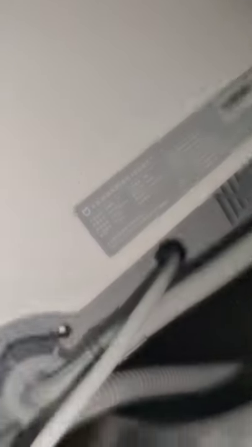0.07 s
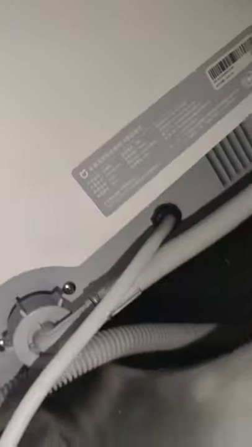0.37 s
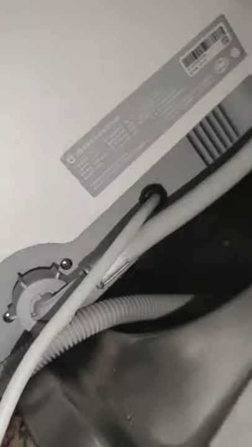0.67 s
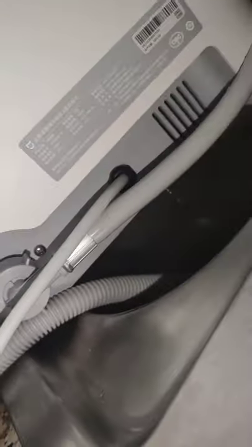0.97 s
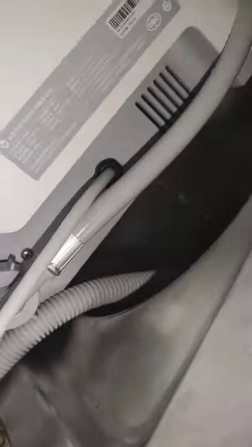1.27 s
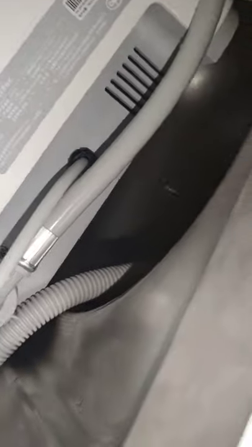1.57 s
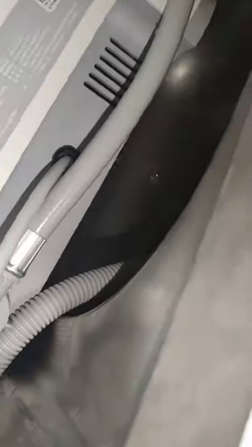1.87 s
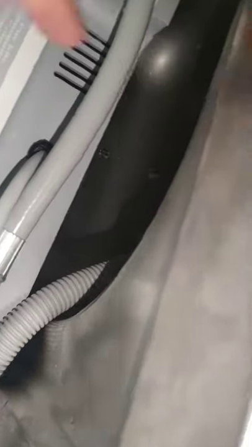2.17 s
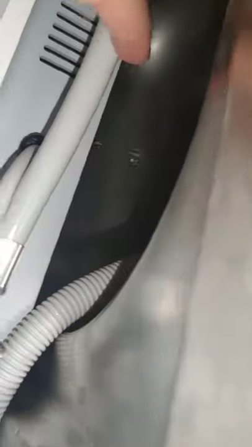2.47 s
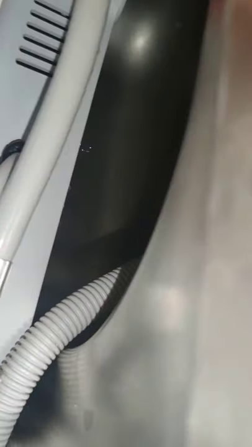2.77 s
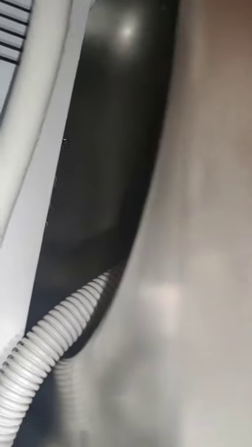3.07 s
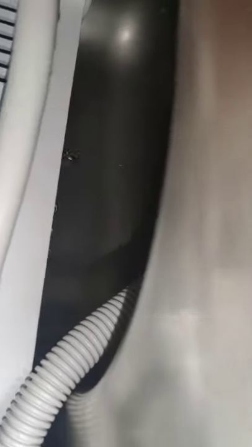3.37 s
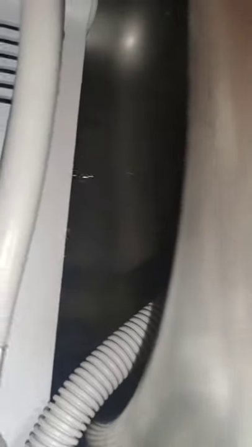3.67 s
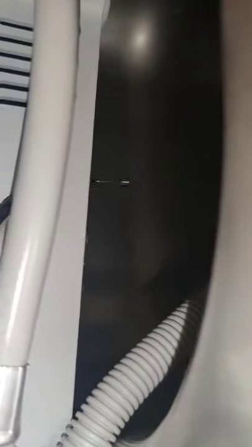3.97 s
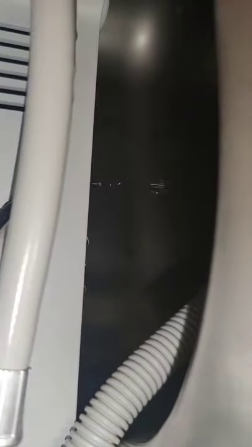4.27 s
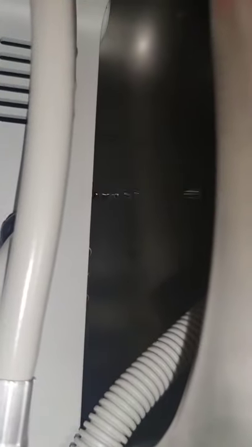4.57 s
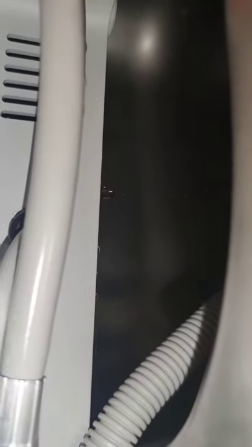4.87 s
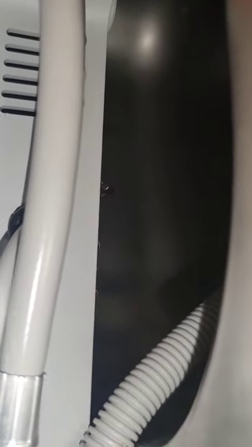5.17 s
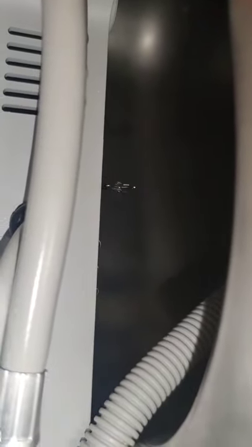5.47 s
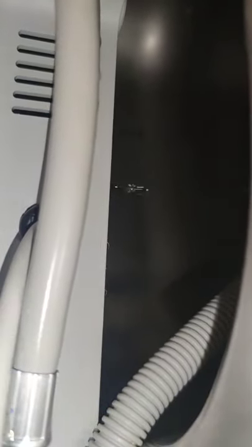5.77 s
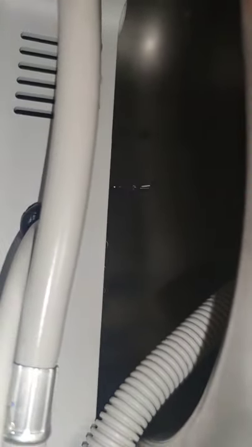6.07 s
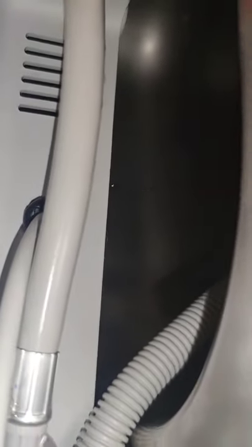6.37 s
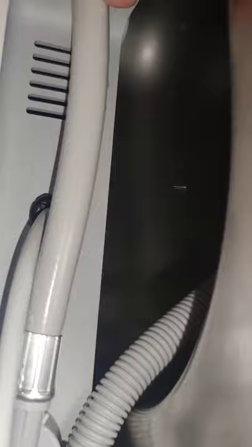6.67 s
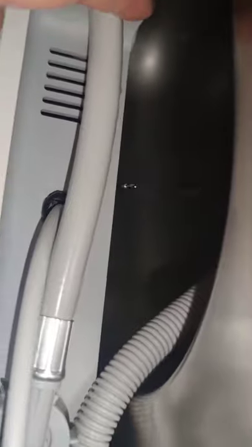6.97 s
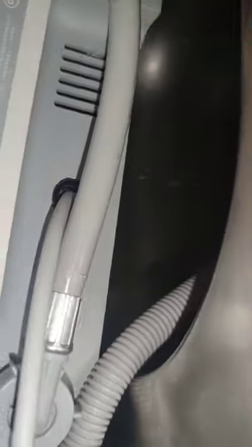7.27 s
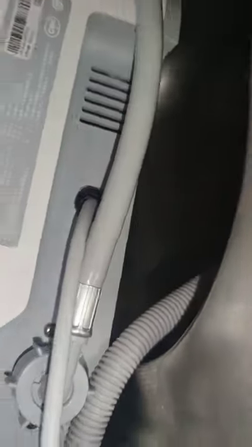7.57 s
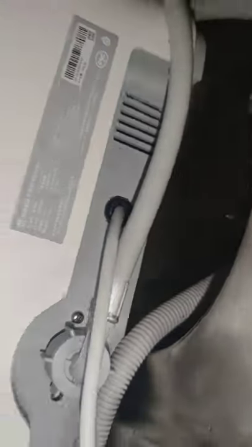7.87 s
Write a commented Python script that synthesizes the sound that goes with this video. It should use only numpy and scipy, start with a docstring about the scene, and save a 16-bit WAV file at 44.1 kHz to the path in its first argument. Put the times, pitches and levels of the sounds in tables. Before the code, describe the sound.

A low, steady pump hum and churning water come from a household dishwasher, with the microphone near its base. Spray sweeps around inside in a regular rhythm, faintly ringing the panels among drips and splashes. The hum grows slightly as the microphone moves in, and three small plastic knocks sound. After another knock and a soft rub it eases back, and the pump quickens right at the end.

```python
"""A dishwasher runs, heard close to its base. From the start the pump hums in harmonics of a cycle three
mains periods long, turbulent water rumbles and churns, and the spray arm sweeps by a little over twice
a second, ringing the panels amid ticking drops and splashes. The microphone moves in and turns to the
side at 2.3 s with a rub of the hand; three dry knocks follow near 3.5 s, and a knock and a rub near 6 s
as it draws away. At the very end the hum sinks, the pump speeds up and the water surges."""
import sys
import numpy as np
from scipy import signal
from scipy.fft import rfft, irfft
from scipy.io import wavfile
from scipy.ndimage import uniform_filter1d

SR = 44100
rng = np.random.default_rng(int(sys.argv[2]) if len(sys.argv) > 2 else 0)


def dump(signal):
    """Clip the signal to [-1, 1] and save it as 16-bit WAV at the path in sys.argv[1]."""
    limited = np.clip(np.atleast_2d(signal).T, -1, 1)
    pcm = np.round(limited * 32767).astype(np.int16)
    wavfile.write(sys.argv[1], SR, pcm)


N = 353196
TIME, BINS = np.arange(N) / SR, np.fft.rfftfreq(N, 1 / SR)
CHANGE_S, CHANGE_LENGTH_S = 7.85, 0.033  # the pump changes pace
LULL_S, LULL_LENGTH_S = 7.89, 0.055  # its drive falls away briefly

def amp(db):
    """Decibels to amplitude ratio."""
    return 10 ** (np.asarray(db) / 20)

def unit(x):
    """Normalisation to rms 1."""
    return x / np.sqrt(np.mean(x ** 2) + 1e-30)

def curve(rows):
    """Linear interpolation of a time table at every sample."""
    s, *columns = np.transpose(rows)
    return np.array([np.interp(TIME, s, c) for c in columns])

def spectrum(rows):
    """Interpolation of a table over log frequency at every bin."""
    hz, *columns = np.transpose(rows)
    return np.array([np.interp(np.log(BINS + 1), np.log(hz), c) for c in columns])

def drift(rate_hz):
    """Slow random modulation of rms 1."""
    knots = rng.standard_normal(4000)
    return unit(np.interp(2 * rate_hz * TIME + rng.random(), np.arange(len(knots)), knots))

def swell(u):
    """A half-cosine envelope, one unit of time long."""
    return np.cos(np.pi * np.clip(u, -.5, .5))

def step(s, length_s):
    """A raised-cosine transition from 0 to 1, centred on s."""
    return .5 + .5 * np.sin(np.pi * np.clip((TIME - s) / length_s, -.5, .5))

def changed():
    """0 while the pump runs steadily, 1 once it changes pace."""
    return step(CHANGE_S, CHANGE_LENGTH_S)

# Closeness of the microphone. Each row: time in seconds, level of the deepest hum in dB.
PROXIMITY = [(0.1, -33.5), (0.89, -34), (2.2, -32.5), (2.31, -32), (4.32, -29.5), (6.6, -33.5),
             (7.8, -36.5)]
def placed(follow, side_db, turn_s=2.32, turn_length_s=0.76):
    """Distance and directivity: dB gained from a share of the closeness and the turn to the side."""
    near_db = curve(PROXIMITY)[0]
    return follow * (near_db - near_db.mean()) + side_db * step(turn_s, turn_length_s)

# Likeness of left and right. Each row: frequency in Hz, correlation from 0 to 1.
COHERENCE = [(60, 1), (130, 0.96), (290, 0.97), (640, 0.55), (1300, 0), (16000, 0)]
def noise(gain):
    """Spatial coherence: noise of the given density whose long waves reach both channels alike."""
    a, b = rfft(rng.standard_normal((2, N)))
    alike = np.clip(spectrum(COHERENCE)[0], -1, 1)
    return irfft(np.array([a, alike * a + np.sqrt(1 - alike ** 2) * b]) * gain, N) * np.sqrt(SR / 2)

def ripple(depth_db, spacing_hz):
    """Modal overlap: crowded modes of tub and room give each channel an uneven frequency response."""
    knots = rng.standard_normal((2, 4000))
    contour = np.array([np.interp(BINS / spacing_hz, np.arange(len(k)), k) for k in knots])
    return unit(amp(depth_db * contour))

def ring(hz, width_hz):
    """A randomly excited resonance of rms 1; the right channel lags in phase, more at higher pitch."""
    hz = hz * np.ones(N)
    wave = (drift(width_hz) + 1j * drift(width_hz)) * np.exp(2j * np.pi * np.cumsum(hz) / SR)
    lag = min(hz.mean() / 800, np.pi / 2)
    return np.array([wave.real, (wave * np.exp(-1j * lag)).real])

def harmonic(cycles, k):
    """Dispersion: bending waves in the casing give each order k of the pump its own phase."""
    return np.sqrt(2) * np.cos(2 * np.pi * k * cycles + .74 + 1.82 * k - .412 * k ** 2)

# The pump's vibration. Each row: time in seconds, repeat rate in Hz.
FUNDAMENTAL = [(0, 16.6635), (7.83, 16.6635), (7.9, 18.5), (7.95, 22), (8.01, 27)]
def pump_cycles():
    """Phase, in cycles, is the integral of frequency."""
    return np.cumsum(curve(FUNDAMENTAL)[0]) / SR

# Strong harmonics. Each row: order, level in dB, share of closeness, gain at the side in dB,
# gain at the change of pace in dB.
STRONG_ORDERS = [(4, -33.5, 0.97, 0, -3), (8, -43.5, 1.2, -3.5, -1), (10, -41.5, 0.22, 0.24, -15)]
# Weak harmonics. Each row: order (rounded when played), left and right levels in dB.
WEAK_ORDERS = [(2, -85, -66), (5, -49.5, -48), (6, -47, -54.5), (7, -54, -51.5), (9, -53, -54.5),
               (11, -83, -52), (11.9, -51, -57), (13, -55.5, -63), (14, -62, -59), (14.8, -65.5, -59.5),
               (16, -95, -72), (16.9, -68, -72), (18, -54, -61), (20, -73, -69.5), (22, -68, -62),
               (24.2, -62.5, -61.5), (25.8, -72, -74), (26.8, -62, -62), (32.2, -86, -79),
               (38.2, -68.5, -73), (40, -73.5, -80), (44, -93, -68), (46, -114, -71), (50, -104, -69)]
# Their radiation. Each row: nearby order, gain in dB, share of closeness, gain at the side in dB.
WEAK_RADIATION = [(7, -4.5, 0.77, 2), (16.3, 2, 1.17, -5), (40, -5.5, 1.56, 5)]
def hum(cycles, lull_depth_db=-7, strong_waver=0.035, weak_waver=0.4):
    """Periodic forcing: steady strong harmonics over weak ones that waver with the water load."""
    out = np.zeros((2, N))
    lull_db = lull_depth_db * swell((TIME - LULL_S) / LULL_LENGTH_S)
    for k, db, follow, side_db, change_db in STRONG_ORDERS:
        pan_db = (3 + 0.47 * (k - STRONG_ORDERS[0][0])) * np.array([[-.5], [.5]])
        level_db = db + placed(follow, side_db) + change_db * changed() + lull_db
        out += amp(level_db + pan_db) * harmonic(cycles, round(k)) * (1 + strong_waver * drift(16))
    orders = [row[0] for row in WEAK_RADIATION]
    reach = amp([db + placed(follow, side) - 6 * changed() for _, db, follow, side in WEAK_RADIATION])
    for k, left_db, right_db in WEAK_ORDERS:
        shares = np.array([np.interp(k, orders, one) for one in np.eye(len(orders))])
        gain = amp([[left_db], [right_db]]) * (shares @ reach)
        out += gain * harmonic(cycles, round(k)) * (1 + weak_waver * drift(1.485))
    return out

def impeller(cycles, depth):
    """Amplitude modulation: the impeller pulses the flow at orders 2 and 4."""
    return unit(1 + depth * (harmonic(cycles, 2) + harmonic(cycles, 4)) / 2)

# Spectrum of the rumble. Each row: frequency in Hz, left and right densities in dB per Hz.
RUMBLE_SPECTRUM = [(9.8, -73, -87), (20, -74, -92), (43.3, -91, -93), (58.4, -80, -83), (110, -70.5, -66.5),
                   (152, -76.5, -69), (204, -85.5, -83.5), (267, -80, -71), (337, -85.5, -84.5),
                   (407, -78.5, -83.5), (437, -80.5, -80), (576, -100, -100), (990, -140, -140)]
# Turbulence in the pump, driving the deep part. Each row: time in seconds, gain in dB.
DEEP_GAIN = [(0, 9), (.5, -3), (2.05, 4), (2.6, -6), (4.4, -6), (4.75, 1), (5.7, 2), (6.25, 3), (7.7, 4)]
# The rumble's upper part. Each row: time in seconds, gain in dB.
UPPER_GAIN = [(0, -1), (1.9, 1.5), (2.6, -2.5), (3.3, 2), (4.6, 1.5), (5.7, -1), (6.4, -4.5), (7.8, -4.5)]
def rumble(cycles, crossover_hz=200):
    """Turbulent pressure makes low noise, pulsed by the impeller; its upper part also flutters."""
    colour = amp(spectrum(RUMBLE_SPECTRUM))
    deep_share = 1 / (1 + (BINS / crossover_hz) ** 8)
    upper = noise(colour * np.sqrt(1 - deep_share)) * amp(curve(UPPER_GAIN))
    upper *= unit(1 + 0.33 * harmonic(cycles, 2))
    deep = noise(colour * np.sqrt(deep_share)) * amp(curve(DEEP_GAIN) - 0.5)
    return (deep + upper) * impeller(cycles, depth=0.74)

# Spectrum of churning water. Each row: frequency in Hz, left and right densities in dB per Hz.
CHURN_SPECTRUM = [(252, -115, -115), (548, -86.5, -79.5), (591, -83.5, -95.5), (682, -83.5, -79),
                  (721, -91, -94.5), (815, -88, -90), (1300, -92, -91), (1290, -84, -96.5),
                  (1700, -89, -91.5), (1970, -90, -94), (1944, -95, -94), (2295, -100, -95),
                  (3180, -125, -125)]
def churning(sweep_db, surge, crossover_hz=1100):
    """Flow noise coloured by the tub's modes: churning below, sloshing with the spray arm above."""
    colour = amp(spectrum(CHURN_SPECTRUM)) * ripple(depth_db=2.5, spacing_hz=10)
    upper_share = 1 / (1 + (crossover_hz / (BINS + 1)) ** 8)
    churn = noise(colour * np.sqrt(1 - upper_share)) * amp(3 + placed(follow=1.25, side_db=-3))
    slosh_db = 0.54 + 0.44 * sweep_db + placed(follow=0.52, side_db=0)
    slosh = noise(colour * np.sqrt(upper_share)) * amp(slosh_db)
    return surge * churn + slosh

def drone(sweep_db, start_hz=491.2, rise_hz_per_s=2.4, wander_hz=4.12, sag_hz=50):
    """A narrow resonance of the flowing water creeps up in pitch, then sags at the pump's lull."""
    hz = start_hz + rise_hz_per_s * TIME + wander_hz * drift(1.5) - sag_hz * step(LULL_S, LULL_LENGTH_S)
    return ring(hz, width_hz=16) * amp(-60 + 0.42 * sweep_db + placed(follow=.4, side_db=4))

# Passes of the spray arm. Each row: centre in seconds, swell in dB.
ARM_PASSES = [(.36, 4.5), (0.745, 2.5), (1.17, 3.5), (1.74, 5), (2.165, 5), (2.66, 2.5), (3.142, 5),
              (3.603, 5.3), (4.03, 2.5), (4.47, 6), (4.838, 3), (5.188, 3), (5.57, 5.5), (5.966, 4.5),
              (6.417, 3), (6.777, 3.5), (7.02, 2), (7.463, 3), (7.83, 1)]
def arm_sweep(pass_length_s=0.34, flutter_db=1.34, sag_db=5):
    """Modulation by rotation, in dB: the spray swells at each pass and sags at the pump's lull."""
    level_db = sum(db * swell((TIME - s) / pass_length_s) ** 2 for s, db in ARM_PASSES)
    return level_db - level_db.mean() + flutter_db * drift(9) - sag_db * step(LULL_S, CHANGE_LENGTH_S)

# Fizz of the jets. Each row: frequency in Hz, left and right densities in dB per Hz.
FIZZ_SPECTRUM = [(1900, -125, -125), (2600, -100, -99), (2550, -101.5, -93), (3030, -98.5, -103),
                 (2960, -100, -99), (3880, -100, -102), (4700, -106, -108), (6000, -108, -110),
                 (7000, -115, -108), (7590, -114, -99), (8870, -125, -92.5), (8520, -122, -94),
                 (10380, -122, -106), (15700, -120, -113)]
# Tub and panel modes. Each row: frequency and width in Hz, left, right and side gains in dB.
PANEL_MODES = [(1180, 14, -73.5, -76.5, 5), (1343, 22, -68.5, -70.5, 0.5), (1612, 17, -66.5, -71.5, 1),
               (1956, 10, -76, -77, 6), (2990, 30, -82, -87, 3), (3040, 55, -78.5, -90, 7),
               (3484, 35, -80.5, -93, 4), (3970, 80, -78.5, -87, 2), (5320, 160, -76.5, -82, -4),
               (8340, 150, -100, -75, 0), (8750, 80, -106, -73.5, -.5), (12200, 240, -106, -89, 11)]
def spray(sweep_db, patter_db=1.3, wander_db=1.26):
    """Random impact excitation: the jets make a pattering fizz and ring the panels they strike."""
    fizz_db = -1 + 0.54 * sweep_db + placed(follow=.25, side_db=0.83)
    colour = amp(spectrum(FIZZ_SPECTRUM)) * ripple(depth_db=4.5, spacing_hz=45)
    out = noise(colour) * amp(fizz_db + patter_db * drift(100))
    for hz, width_hz, left_db, right_db, side_db in PANEL_MODES:
        struck_db = -1 + 0.86 * sweep_db + placed(0.13, side_db) + wander_db * drift(2.5)
        out += amp([[left_db], [right_db]]) * amp(struck_db) * ring(hz, width_hz)
    return out

# Cabinet modes. Each row: frequency and width in Hz, level in dB, share of closeness, side gain in dB.
CABINET_MODES = [(281.7, 16, -55.5, 1.6, -4.5), (447.3, 16, -59, 0.94, -7.5), (1447, 28, -59.5, 0.085, -7)]
def cabinet(pan_db_per_octave=1.5):
    """Sympathetic resonance: the cabinet rings along, its higher modes leaning to the left."""
    out = np.zeros((2, N))
    for hz, width_hz, db, follow, side_db in CABINET_MODES:
        pan_db = pan_db_per_octave * np.log2(hz / CABINET_MODES[0][0]) * np.array([[.3], [-.7]])
        out += ring(hz, width_hz) * amp(db + placed(follow, side_db) + pan_db)
    return out

# Spectrum of the hiss. Each row: frequency in Hz, left and right densities in dB per Hz.
HISS_SPECTRUM = [(3000, -115, -115), (8200, -120, -114), (9600, -117, -113), (12300, -116.5, -111),
                 (14200, -110.5, -110), (15900, -110, -111)]
def hiss():
    """Stationary broadband noise, heard as a faint hiss."""
    return noise(amp(spectrum(HISS_SPECTRUM)))

def bursts(rows, envelope):
    """Transients as enveloped bands of noise; the right channel is the brighter."""
    size = SR // 2
    hz, out = np.fft.rfftfreq(size, 1 / SR), np.zeros((2, N))
    right_lead_db = np.interp(hz, [4000, 6030, 8200, 11100, 15700], [-2, 15, 23, 25, -14])
    pan_db = right_lead_db * np.array([[-.5], [.5]])
    for s, db, centre_hz, octaves, length_s in rows:
        band = np.exp(-.5 * (np.log2((hz + 1) / centre_hz) / octaves) ** 2) * amp(pan_db - pan_db.max(0))
        grain = unit(irfft(rfft(rng.standard_normal((2, size))) * band, size))
        at = np.arange(size) + round(s * SR) - size // 2
        inside = (at >= 0) & (at < N)
        out[:, at[inside]] += (amp(db) * grain * envelope((at / SR - s) / length_s))[:, inside]
    return out

def drop_shape(u):
    """Exponential damping: a quick rise, then 60 dB of decay per unit of time."""
    return np.clip(u * 16, 0, 1) * amp(-60 * np.maximum(u - 1 / 16, 0))

# Large drops. Each row: start in seconds, level in dB, centre in Hz, width in octaves.
DROP_IMPACTS = [(.102, -55, 12000, .4), (1.176, -51.5, 7250, .35), (1.797, -57, 10000, 0.38),
                (1.96, -59, 11000, .4), (2.104, -55.5, 8000, .6), (2.715, -63.5, 13500, .3),
                (3.421, -51, 8200, .21), (3.691, -49, 10500, 0.66), (3.96, -56, 14000, .25),
                (4.225, -56, 10500, .5), (4.498, -50.5, 8700, 0.21), (4.597, -49, 10100, .26),
                (5.49, -58, 13500, .3), (6.325, -59.5, 13000, .3), (6.504, -56, 11000, .4),
                (6.885, -63.5, 13500, .3), (7.399, -51.5, 8400, 0.24)]
def drops(large_t60_s=0.047, small_t60_s=.06, small_count=70):
    """Brief impacts radiate treble: large drops tick among small ones of random size and pitch."""
    large = [(*row, large_t60_s) for row in DROP_IMPACTS]
    small = [(when * TIME[-1], -66 + 3 * min(-np.log(size), 3), 8100 + 1300 * pitch, .1, small_t60_s)
             for when, size, pitch in rng.random((small_count, 3))]
    return bursts(large + small, drop_shape)

# Splashes on the wall. Each row: peak time in seconds, level in dB, length in seconds.
WALL_SLAPS = [(.33, -69, .25), (3.6, -61, .12), (4.031, -63, 0.099), (4.46, -63, 0.18),
              (4.831, -55.5, .055), (6.99, -68, .1), (7.523, -69, 0.34)]
def splashes(centre_hz=2970, octaves=0.21):
    """Impact noise: water slaps the wall of the tub."""
    return bursts([(s, db, centre_hz, octaves, length_s) for s, db, length_s in WALL_SLAPS], swell)

# Hand rubs. Each row: peak time in seconds, level in dB, centre in Hz, width in octaves, length in seconds.
HAND_RUBS = [(2.29, -73, 13000, .5, .25), (5.96, -61, 7000, 1, .14)]
def hand_rubs():
    """Friction noise: twice a hand rubs nearby with a brief, broad hiss."""
    return bursts(HAND_RUBS, swell)

# Modes of damped plastic. Each row: frequency in Hz, level in dB, 60 dB decay time in seconds.
PLASTIC_MODES = [(780, -5, .006), (1280, -4, .006), (2350, -6.5, 0.0019), (5160, -12.5, .003)]
# Dry knocks close by. Each row: start in seconds, gain in dB, contact time in seconds.
KNOCK_HITS = [(3.418, -34, .00006), (3.5295, -31, .00004), (3.6245, -26.5, .00012), (5.8205, -29, .0003)]
def knocks(right_share=0.15):
    """Damped free vibration of struck plastic; a longer contact filters out more treble."""
    t, out = TIME[:SR // 20], np.zeros(N)
    plastic = sum(amp(db - 60 * t / t60) * np.sin(2 * np.pi * hz * t) for hz, db, t60 in PLASTIC_MODES)
    for s, db, contact_s in KNOCK_HITS:
        knock = uniform_filter1d(plastic, size=round(contact_s * SR), mode="constant")
        out[round(s * SR):][:len(t)] += amp(db) * knock
    return np.array([out, right_share * out])

def scene(surge_db=5.5):
    """Superposition of all sources; the water surges as the pump changes pace."""
    cycles, sweep_db = pump_cycles(), arm_sweep()
    surge = amp(surge_db * changed())
    water = drops() + surge * rumble(cycles)
    water += (churning(sweep_db, surge) + drone(sweep_db)) * impeller(cycles, depth=.12)
    water += spray(sweep_db) + splashes()
    return water + hand_rubs() + hum(cycles) + cabinet() + hiss() + knocks()

def record(dry):
    """Band limiting: a linear-phase low-pass at 15780 Hz."""
    lowpass = signal.firwin(801, 15780, window=("kaiser", 9), fs=SR)
    return signal.oaconvolve(dry, lowpass[None], "same")

dry = scene()
out = record(dry)
dump(out)
```